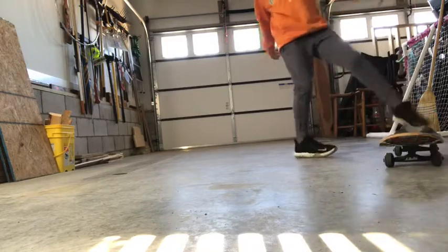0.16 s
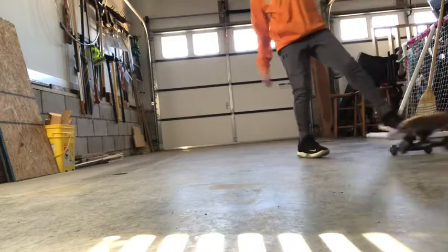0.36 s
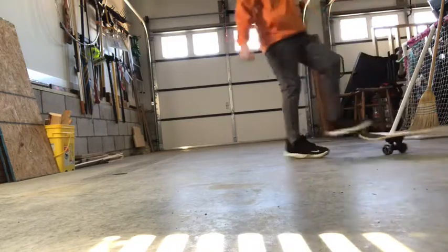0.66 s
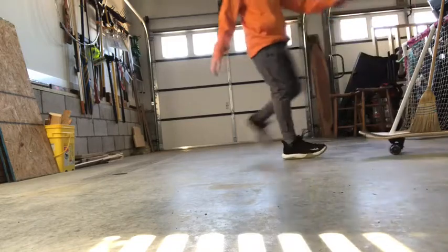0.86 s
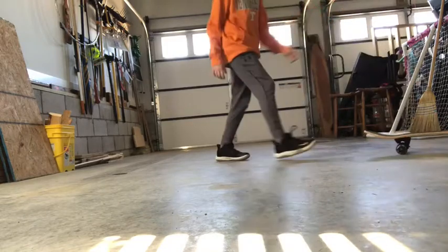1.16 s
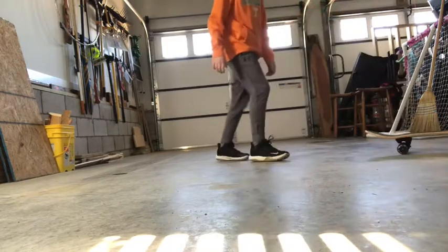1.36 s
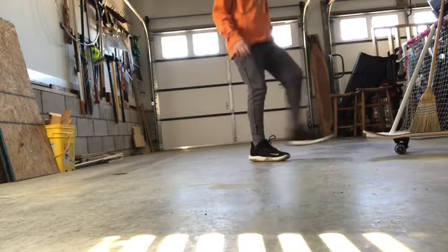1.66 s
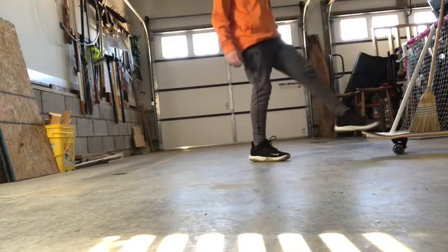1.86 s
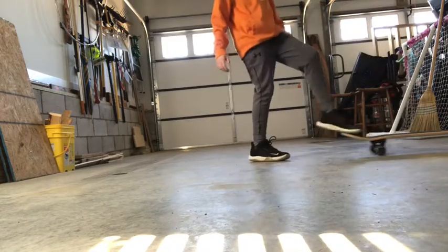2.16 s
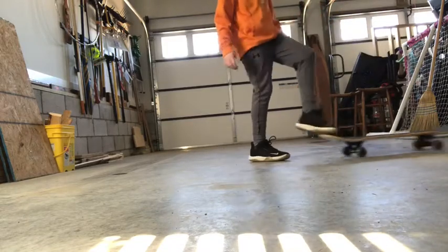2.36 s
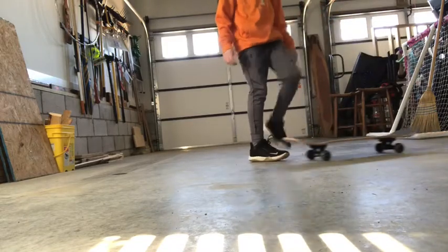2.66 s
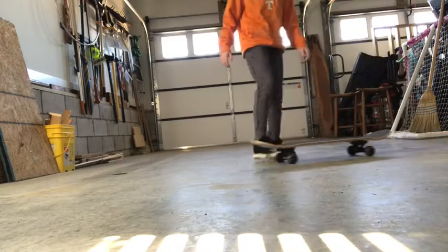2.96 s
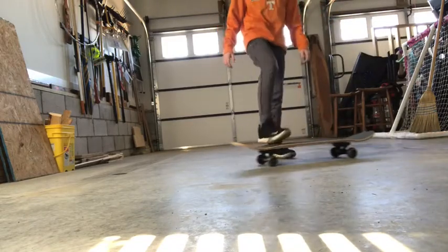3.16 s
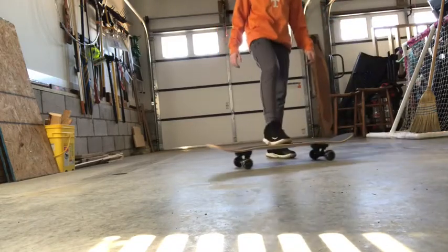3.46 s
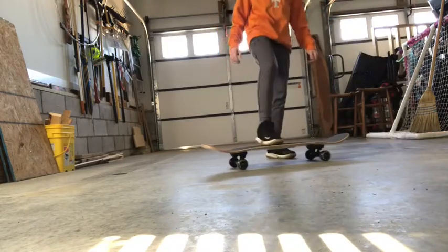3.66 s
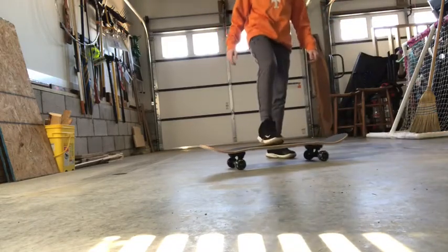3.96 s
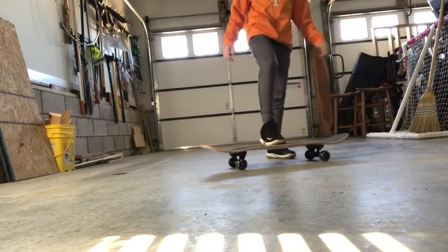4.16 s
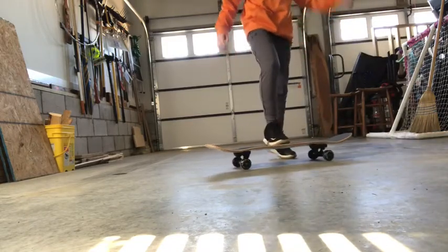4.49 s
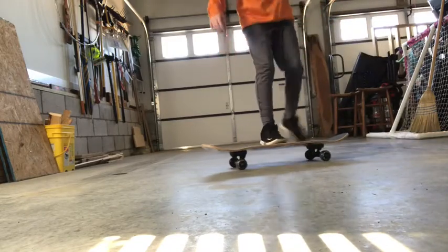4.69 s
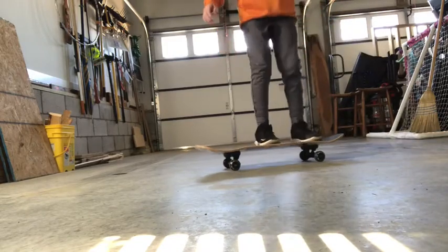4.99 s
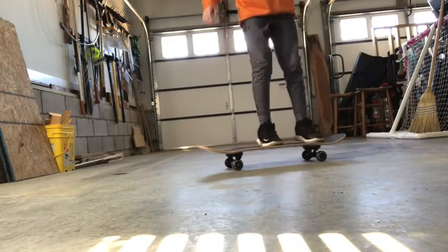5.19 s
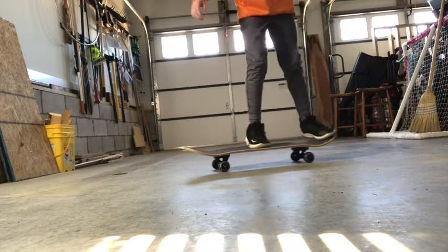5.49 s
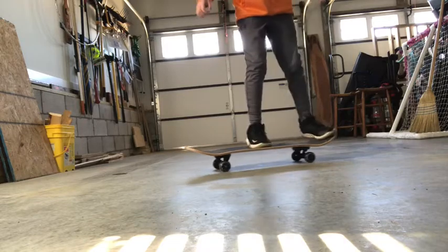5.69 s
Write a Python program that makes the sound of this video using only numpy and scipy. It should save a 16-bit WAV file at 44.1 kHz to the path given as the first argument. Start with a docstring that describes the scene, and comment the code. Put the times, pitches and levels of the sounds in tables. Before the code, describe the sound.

In a closed garage, a foot tips a skateboard with a few light knocks, then the board smacks down on the concrete in a loud, quick clatter. A sharp slap and lighter wooden knocks follow as the rider drags it back and steps on, with soles scuffing, grit snapping and wheels rumbling softly. Heard from low down a few metres away, each hit echoes over a faint machine hum.

```python
"""A closed garage with a concrete floor, where a skateboard is heard from low down a few metres away.
A foot tips the board, which smacks down and clatters: each impact excites resonances of deck and room.
The rider steps about, drags it back and stands on it. Friction makes soles rasp on the grip tape,
grit snaps, and the rough floor sets the wheels rumbling softly. The bare room reverberates
after every blow, over the faint hum of a distant machine."""
import sys
import numpy as np
from scipy import signal
from scipy.fft import rfft, irfft
from scipy.io import wavfile
from scipy.ndimage import uniform_filter1d

SR = 44100
rng = np.random.default_rng(int(sys.argv[2]) if len(sys.argv) > 2 else 0)


def wav_out(sig):
    """Save sig, one row per channel (or a flat mono array), as 16-bit PCM at SR to the path in sys.argv[1]."""
    wavfile.write(sys.argv[1], SR, np.round(np.clip(np.atleast_2d(sig).T, -1, 1) * 32767).astype(np.int16))


N = 257103

# Spectrum of a breaking grain. Each row: frequency in Hz, gain in dB.
FRACTURE_SPECTRUM = [(500, -20), (3000, -10), (6500, -2), (9000, -8), (12500, -4), (15500, -5)]


def board():
    """Impact excitation: each blow cracks, knocks, bends the deck and leaves deck and room ringing."""
    # Each row: start in seconds, force in dB, weight in dB, hardness in dB,
    # knock level in dB relative to the force, starting pitch of the knock in Hz.
    blows = [ (.0700, -2.5, 4, 4, -25.5, 1640), (.1070, -10, 10.5, 6, -26, 1520),
             (.1970, -3.5, 2.5, -10, -25, 1640), (.3000, -18.5, 8, 18, -17, 1880),
             (0.5506, -4, -25, -25, -29, 1290), (0.5553, 18, 3.5, 7, -23, 2560),
             (0.5643, 16.5, -23, -13, -35.5, 1100), (0.5792, 18, -4, -21, -37.5, 656),
             (.6130, 19, -33, -20, -31, 2190), (0.6884, 17.5, -3.5, -2.5, -36, 1600),
             (0.746, 14, -24, -11, -33, 918), (1.7256, -12, 5.5, 0.5, -33, 1130),
             (1.9028, 3, 0.5, 0, -36, 1000), (1.9250, -2, -25, -10, -26.5, 955),
             (1.9610, -3.5, -19, -10, -23.5, 990), (2.2279, -17, -12, -1, -20.5, 1490),
             (2.5905, -4, -3.5, 5, -21.5, 2270), (3.2390, -7.5, 3.5, 6.5, -29, 1080),
             (3.2890, -10.5, 5, -6, -25.5, 1050), (4.3609, -12.5, -10, 1, -27, 1240),
             (4.7058, 4, 5, 3.5, -22.5, 1743), (5.2262, -15.5, 4.5, 5.5, -26, 1360), ]
    # The deck bending on its trucks. Each row: frequency in Hz, relative level in dB, T60 in seconds.
    bending_modes = [(82.2, -43, 1), (116, -12, 0.49), (144.3, 4, 0.24), (152, -10.5, 0.14)]
    # Deck and room resonances that ring on after each blow.
    # Each row: frequency in Hz, relative level in dB, T60 in seconds.
    ringing_modes = [(247.9, 7, 0.66), (268, -25, 0.69), (338.5, 10, 0.88), (364.3, 11.5, 0.51),
                     (494, -3, 0.42), (530, 2.5, 1.06), (565, 8, 0.63), (608, -2, 1.4), (657, -25, 0.38),
                     (855, -6, 0.4), (1063, 13.5, 0.37), (1142, 2.5, 0.72), (1160, -47, 0.53),
                     (1347, 0, 0.37), (1800, -32, 1.2), (1934, 14, 0.074)]
    # The plies absorb a knock's treble. Each row: frequency in Hz, gain in dB.
    ply_response = [(300, -1.5), (1800, 1.5), (2300, 1.5), (5000, -39.5)]
    flex_db, thud_db, ring_db = -32.5, -45, -57.5  # relative to force; weight adds to flex and thud
    direct, to_room = np.zeros((2, N))
    flex = modes(bending_modes, rise_s=0.018, phase_spread=0)
    for start, force_db, weight_db, hardness_db, knock_db, knock_hz in blows:
        hit = amp(force_db) * blow(weight_db, hardness_db)
        cycles = 3.52 * (1000 / knock_hz) ** 1.225  # higher knocks are damped in fewer cycles
        bending_wave = knock(knock_hz, cycles, sag=0.326)  # dispersion: fast, high waves arrive first
        wood = amp(force_db + knock_db) * colour(bending_wave, ply_response)
        thud = knock(hz=229.6, cycles=2.7)  # the trucks bottom out on their bushings
        ring = modes(ringing_modes, rise_s=0.004, phase_spread=1, drift_hz=7)
        add(direct, start, hit + wood)
        add(direct, start, amp(force_db + weight_db + flex_db) * flex)
        add(direct, start, amp(force_db + weight_db + thud_db) * thud)
        add(direct, start, amp(force_db + ring_db) * ring)
        room_gain = amp(3 - 0.17 * force_db)  # the strongest blows are heard most directly
        add(to_room, start, room_gain * (hit + amp(-9) * wood))
    return direct, to_room


def blow(weight_db, hardness_db):
    """Contact time sets bandwidth: a hard blow is short and bright, and weight adds bass."""
    return contact(low_db=1 + 0.54 * weight_db, clack_db=-1.5 + 0.33 * hardness_db,
                   crack_db=hardness_db, tick_db=hardness_db - 2.5,
                   chatter_s=0.0046 * amp(-0.39 * hardness_db))


def contact(low_db, clack_db, crack_db, tick_db, chatter_s):
    """Impact noise is broadband: the harder the surfaces that meet, the more crack and tick."""
    # Each row: frequency in Hz, gain in dB.
    impact_spectrum = [(30, -32), (55, -22), (85, -9.5), (170, -2), (260, -4.5), (345, 1.5), (430, -2),
                       (620, 0), (780, -1.5), (1150, 0), (1750, -3), (2200, -9.5), (2900, -15.5),
                       (4600, -20.5), (5400, -24.5), (7500, -27), (9000, -33), (15500, -31.5)]
    tone = [(250, low_db), (600, 0), (900, 0), (1600, clack_db),
            (3200, crack_db), (5000, crack_db), (11000, tick_db)]
    return colour(colour(chatter(chatter_s), impact_spectrum), tone)


def chatter(decay_s, size=8192):
    """Rebound: a first touch and a dying burst of tiny re-contacts, with a flat spectrum overall."""
    t = np.arange(size) / SR
    burst = rng.standard_normal(size) * np.exp(-t / max(decay_s, 1e-4))
    burst /= np.linalg.norm(burst)
    burst[0] += np.exp(-decay_s / 0.0079)  # a short contact is mostly one clean touch
    spectrum = rfft(burst)
    local_power = uniform_filter1d(abs(spectrum) ** 2, size=48)
    return irfft(spectrum / np.sqrt(local_power))[:size // 2]


def knock(hz, cycles, sag=0, size=4096):
    """Heavily damped oscillation: it peaks after about the given cycles; sag makes its pitch sink."""
    age = hz * np.arange(size) / SR / max(cycles, 0.2)
    turns = np.cumsum(hz * np.exp(-sag * age)) / SR
    envelope = (age * np.exp(1 - age)) ** 2.03
    return envelope * np.sin(2 * np.pi * turns)


def modes(table, rise_s, phase_spread, drift_hz=0, size=32768):
    """Free vibration is a sum of dying modes; the place struck sets their phases, load detunes them."""
    t, ring = np.arange(size) / SR, np.zeros(size)
    for hz, db, t60 in table:
        drift = drift_hz * np.repeat(rng.standard_normal(size // 1024), 1024)
        turns = np.cumsum(hz + drift) / SR + phase_spread * rng.random()
        ring += amp(db - 60 * t / t60) * np.sin(2 * np.pi * turns)
    onset = 1 - np.exp(-(t / rise_s) ** 2)
    fade = 1 - (t / t[-1]) ** 2
    return ring * onset * fade


def bumps():
    """Soft contacts excite only low frequencies: heels and rocking trucks give dull bumps."""
    # Each row: start in seconds, peak level in dB, frequency in Hz.
    soft_contacts = [(.002, -39.5, 127), (1.74, -40, 137), (2.339, -44, 139), (2.367, -44, 117),
                     (2.463, -42, 106), (2.856, -40.5, 136), (3.302, -35, 121)]
    sound = np.zeros(N)
    for start, db, hz in soft_contacts:
        add(sound, start, amp(db) * knock(hz, cycles=1.96))
    return sound


def trucks():
    """Modal ringing of steel: loose washers and kingpin clink as the weight shifts."""
    # Each row: start in seconds, relative level in dB.
    clinks = [(0.3, -54), (2.59, -51), (3.51, -51), (3.562, -57), (4.057, -68), (4.359, -63), (4.708, -47)]
    # Each row: frequency in Hz, relative level in dB, T60 in seconds.
    steel_modes = [(1380, -14, .25), (2350, 13, 0.096), (2700, -27, .12), (3260, 9, .17), (3620, 0, 0.26),
                   (3950, 1, 0.59), (4420, 0.5, 0.53), (4850, 3, 0.2), (5000, -2, .2)]
    sound = np.zeros(N)
    for start, db in clinks:
        ring = modes(steel_modes, rise_s=0.0026, phase_spread=0.97, drift_hz=60.3)
        add(sound, start, amp(db - 10) * ring)
    return sound


def floor_slaps():
    """Impact noise: sharp slaps on the concrete; the first is followed by a quick, faint echo."""
    # Each row: start in seconds, force in dB, low, clack, crack and tick gains in dB,
    # chatter decay in seconds, gain into the room in dB.
    slaps = [ (1.1990, 1.5, -1, -5.5, 9.5, 15, 0.0054, -4), (1.2217, -19, 0, 2, 20, 13, 0.00097, -5),
             (3.512, -10.5, -9, 1.5, 12, 10, 0.0084, 2), (5.598, -17.5, -4, 1, 14, 10, 0.025, -3), ]
    direct, to_room = np.zeros((2, N))
    for start, force_db, *touch, room_db in slaps:
        slap = amp(force_db) * contact(*touch)
        add(direct, start, slap)
        add(to_room, start, amp(room_db) * slap)
    return direct, to_room


def grit():
    """Brittle fracture: single grains snap under soles and wheels."""
    # Each row: start in seconds, relative level in dB, decay time in seconds.
    snaps = [(1.97, -31, .006), (2.072, -22, .005), (2.21, -23.5, .008), (2.5957, -12, 0.014),
             (2.763, -22.5, 0.002), (4.4632, -32, 0.0024)]
    sound = np.zeros(N)
    for start, db, decay_s in snaps:
        add(sound, start, amp(db) * colour(chatter(decay_s), FRACTURE_SPECTRUM))
    return sound


def grip_tape():
    """Sliding friction: rubber drags over fine grains in a rasp that flutters with the pressure."""
    # Each row: start in seconds, length in seconds, relative level in dB.
    scuffs = [(0, 0.12, -48.5), (.1, 0.044, -43), (.445, 0.075, -43), (.795, 0.038, -50), (1.85, 0.56, -70),
              (5.04, 0.076, -57.5)]
    # Each row: frequency in Hz, gain in dB.
    friction_spectrum = [(300, -22), (1500, 9), (3000, 5.5), (5500, 12), (7500, 9.5), (9000, 6), (13000, 5),
                         (16000, 3.5)]
    rasp = noise(friction_spectrum) * amp(wander(hz=25))
    return rasp * strokes(scuffs, swell_share=0.31, release_s=0.066)


def dust(grains_per_s=2000):
    """Shot noise: specks crushed under wheels and soles burst at random in a fine, bright crackle."""
    # Each row: start in seconds, length in seconds, relative level in dB.
    crunches = [(.44, .1, -40), (1.85, 0.43, -55), (5.565, 0.03, -56)]
    grains = rng.standard_normal(N) * (rng.random(N) < grains_per_s / SR)
    crackle = evened(colour(grains, FRACTURE_SPECTRUM))
    return crackle * strokes(crunches, swell_share=0.64, release_s=0.031)


def wheels(lumpy_db=2):
    """Rolling noise: rough concrete shakes wheels and deck unevenly as the board is pushed and coasts."""
    # Each row: start in seconds, length in seconds, relative level in dB.
    pushes = [(-.1, 0.3, -42), (.95, 0.18, -42.5), (1.7, 0.56, -42), (2.7, 0.18, -49.5),
              (3.3, 0.091, -45.5), (3.8, 0.19, -46.5), (4.32, 0.18, -48), (4.9, 0.21, -49.5),
              (5.5, 0.23, -48)]
    # Each row: frequency in Hz, gain in dB.
    rolling_spectrum = [(30, -25), (85, -11), (120, 5), (200, 0), (450, -7), (650, -3.5), (850, -4),
                        (1080, 2.5), (1500, -16.5), (2500, -18.5), (5000, -33.5), (12000, -50)]
    rumble = noise(rolling_spectrum) * amp(lumpy_db * wander(hz=36))
    return rumble * strokes(pushes, swell_share=0.57, release_s=0.19)


def reflections(sound):
    """Early reflections: the floor and near walls return delayed, weaker copies."""
    # Each row: delay in seconds, amplitude gain as a ratio.
    echoes = [(.0014, 0.13), (.0033, 0.2), (.0065, 0.12), (.0095, 0.19), (0.0147, 0.13)]
    reflected = np.zeros(N)
    for delay, gain in echoes:
        add(reflected, delay, gain * sound)
    return reflected


def reverberation(sound, build_s=0.014):
    """A diffuse field builds up quickly, and absorption drains each band at its own rate."""
    # Each row: frequency in Hz, T60 in seconds.
    decay_times = [(80, 0.79), (200, 0.76), (500, 0.9), (1200, 0.89), (2500, 0.94), (5000, 0.78),
                   (8000, 0.56), (15000, 0.19)]
    # Strength of the diffuse field. Each row: frequency in Hz, gain in dB.
    room_response = [(60, 27.5), (140, -13.5), (300, 6), (700, 4.5), (1500, 3.5), (4000, 1.5), (8000, 3.5),
                     (15000, -2.5)]
    hz, t, bands = signal.stft(rng.standard_normal(2 * SR), SR, nperseg=512)
    t60 = read(decay_times, hz)[:, None]
    decay = amp(read(room_response, hz)[:, None] - 60 * t / t60)
    unit_energy = np.sqrt(2 * np.log(1000) / (t60 * SR))
    tail = signal.istft(bands * decay * unit_energy, SR, nperseg=512)[1]
    tail *= 1 - np.exp(-(np.arange(len(tail)) / SR / build_s) ** 2)
    return signal.fftconvolve(sound, tail)[:N]


def background(air_db=-52, waver_turns=0.31):
    """Ambient noise: still air, and a distant machine whose hum wavers by phase modulation."""
    # Each row: frequency in Hz, rms level in dB.
    machine_tones = [(56, -72), (172, -59.5), (213, -61), (291, -63), (847, -66)]
    # Each row: frequency in Hz, gain in dB.
    air_spectrum = [(15, -69), (30, -38), (44, -19), (54, 2.5), (68, -6.5), (90, -5.5), (140, -2), (210, 1),
                    (330, -5.5), (480, -8.5), (1000, -12.5), (1500, -17), (2600, -21.5), (4100, -22.5),
                    (5500, -32.5), (7500, -33), (8600, -40), (15500, -41.5)]
    t, hum = np.arange(N) / SR, np.zeros(N)
    for hz, db in machine_tones:
        turns = hz * t + waver_turns * wander(hz=2.83)
        hum += amp(db) * np.sqrt(2) * np.sin(2 * np.pi * turns)
    return hum + amp(air_db) * noise(air_spectrum)


def strokes(rows, swell_share, release_s):
    """Amplitude envelope of movements: each swells over a share of its length, holds and dies away."""
    t, gain = np.arange(N) / SR, np.zeros(N)
    for start, length, db in rows:
        attack = np.clip((t - start) / (swell_share * length), 0, 1)
        release = np.exp(-np.maximum(t - start - length, 0) / release_s)
        gain += amp(db) * attack * release
    return gain


def wander(hz):
    """Low-pass noise: slow random motion of rms 1, up to about hz."""
    rolloff = 1 + (np.fft.rfftfreq(N, 1 / SR) / hz) ** 4
    return evened(irfft(rfft(rng.standard_normal(N)) / rolloff, N))


def noise(spectrum):
    """Filtered white noise of rms 1."""
    return evened(colour(rng.standard_normal(N), spectrum))


def colour(sound, spectrum, size=4096):
    """Minimum-phase filtering: a causal response with the given spectrum."""
    hz = abs(np.fft.fftfreq(size, 1 / SR))
    log_gain = np.log(amp(read(spectrum, hz)))
    taps = np.fft.ifft(np.exp(np.conj(signal.hilbert(log_gain)))).real
    return signal.fftconvolve(sound, taps[:size // 2])[:len(sound)]


def add(mix, start_s, sound):
    """Superposition: a sound joins the mix at its start time."""
    part = mix[max(round(start_s * SR), 0):][:len(sound)]
    part += sound[:len(part)]


def amp(db):
    return 10 ** (np.asarray(db) / 20)


def evened(x):
    """Scales to rms 1."""
    return x / np.sqrt(np.mean(x ** 2) + 1e-20)


def read(points, hz):
    """Reads a spectrum on a log-frequency axis."""
    f, value = np.transpose(points)
    return np.interp(np.log(hz + 1), np.log(f), value)


def scene():
    """Direct sound, early reflections and the diffuse field sum with the background at the ear."""
    slaps_direct, slaps_to_room = floor_slaps()
    snaps = grit()
    board_direct, board_to_room = board()
    clinks = trucks()
    rasp, roll = grip_tape() + dust(), wheels()
    direct = board_direct + bumps() + clinks + slaps_direct + snaps + amp(-7.5) * rasp + amp(-10) * roll
    to_room = board_to_room + amp(-1.5) * clinks + slaps_to_room + snaps
    to_room += amp(-13.5) * rasp + amp(-15.5) * roll
    return (direct + reflections(to_room) + reverberation(to_room) + background())[None]


def record(dry, cutoff_hz=15950):
    """Soft saturation rounds the loudest peaks, and a low-pass filter limits the band."""
    lowpass = signal.firwin(511, cutoff_hz, window=("kaiser", 9), fs=SR)
    return signal.oaconvolve(np.tanh(dry), lowpass[None], "same")


dry = scene()
out = record(dry)
wav_out(out)
```